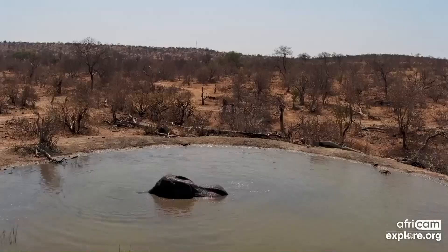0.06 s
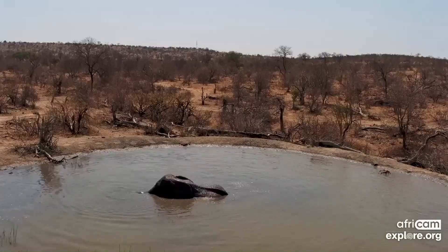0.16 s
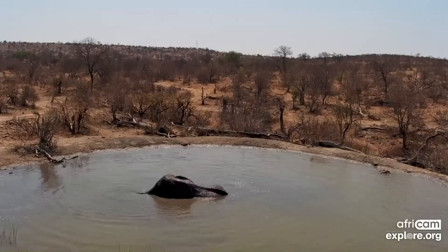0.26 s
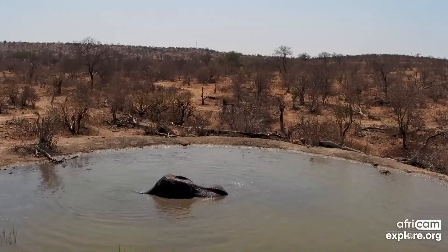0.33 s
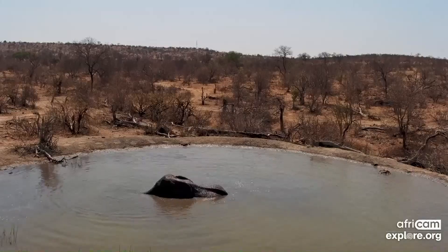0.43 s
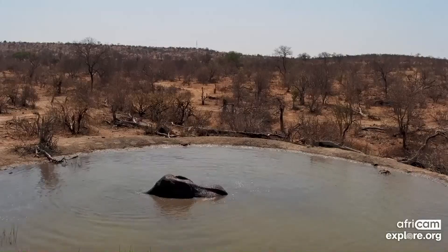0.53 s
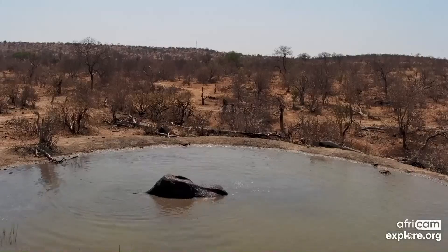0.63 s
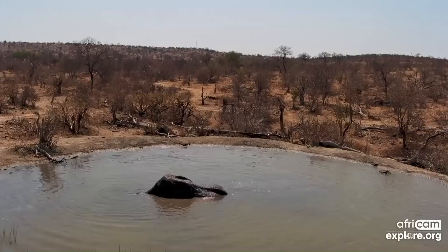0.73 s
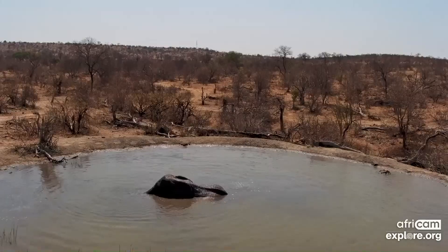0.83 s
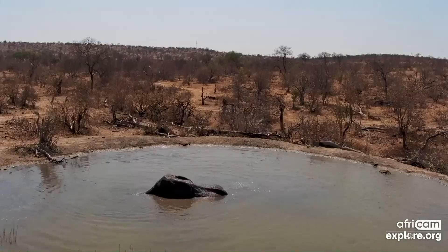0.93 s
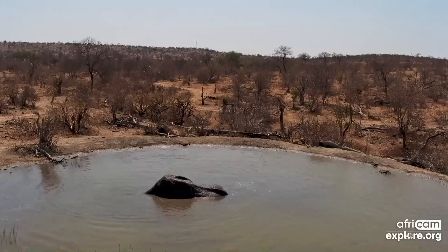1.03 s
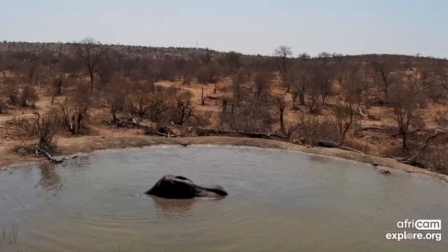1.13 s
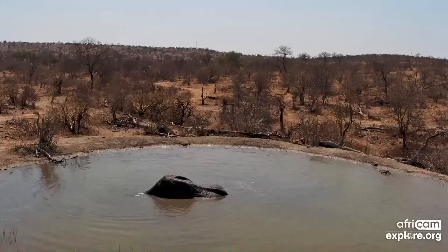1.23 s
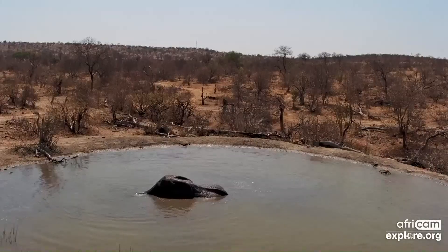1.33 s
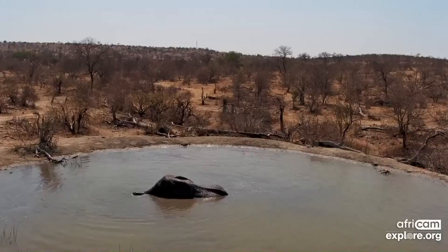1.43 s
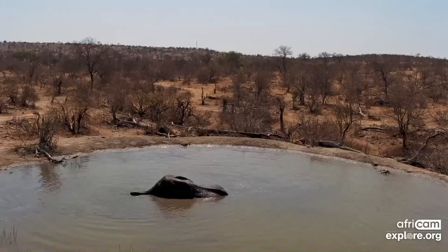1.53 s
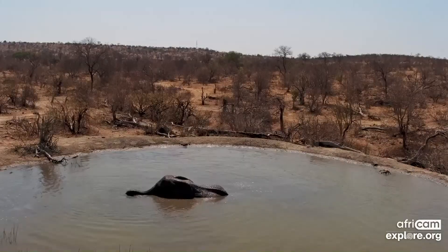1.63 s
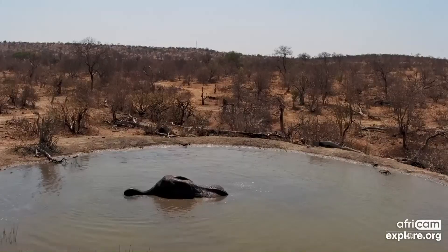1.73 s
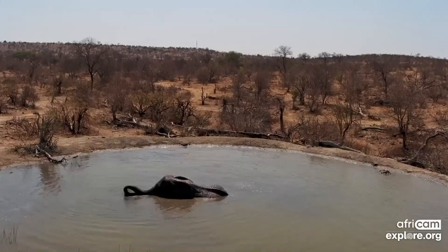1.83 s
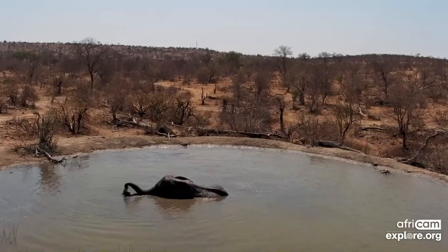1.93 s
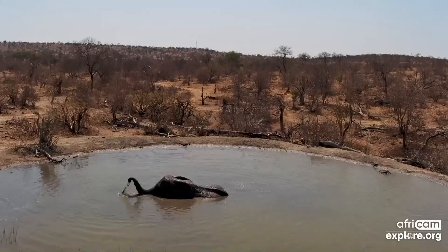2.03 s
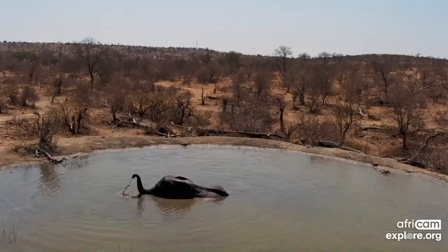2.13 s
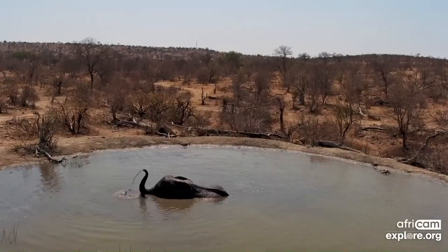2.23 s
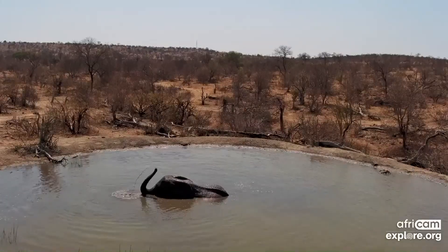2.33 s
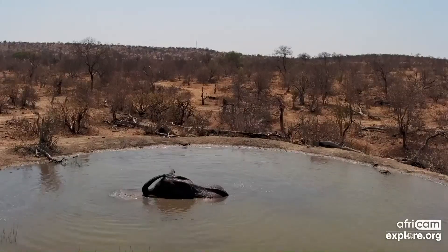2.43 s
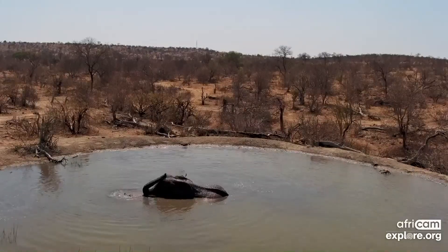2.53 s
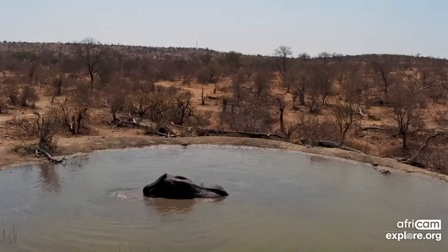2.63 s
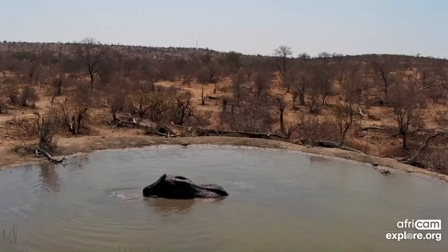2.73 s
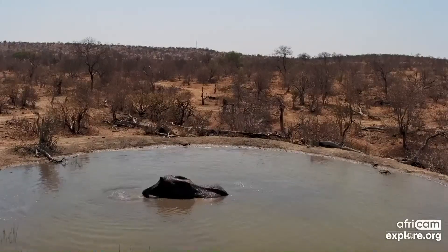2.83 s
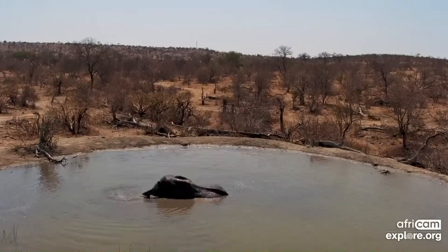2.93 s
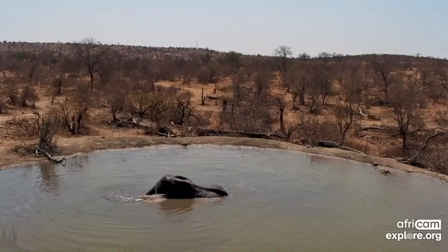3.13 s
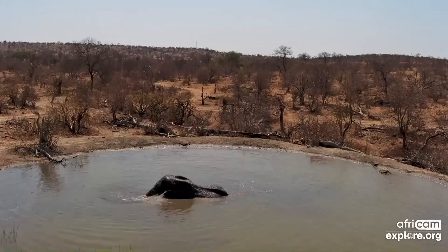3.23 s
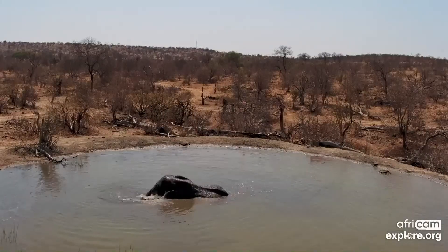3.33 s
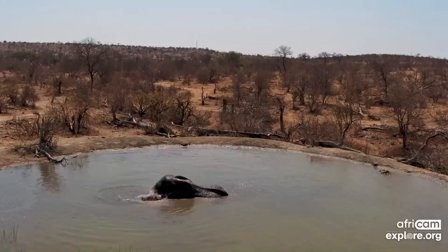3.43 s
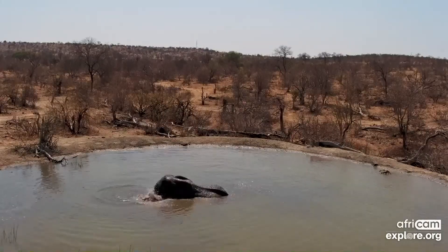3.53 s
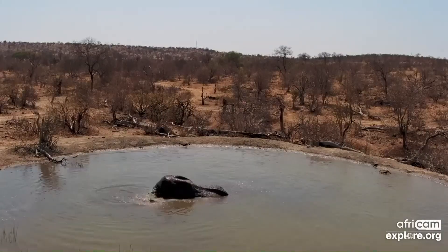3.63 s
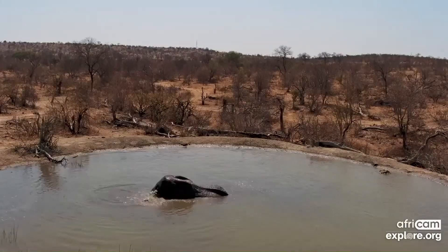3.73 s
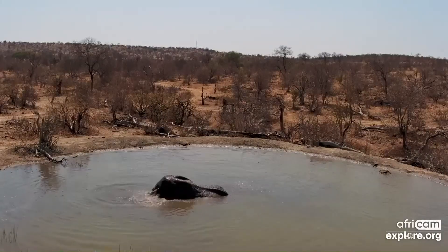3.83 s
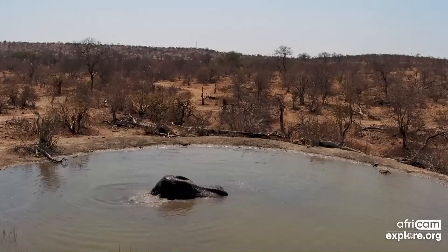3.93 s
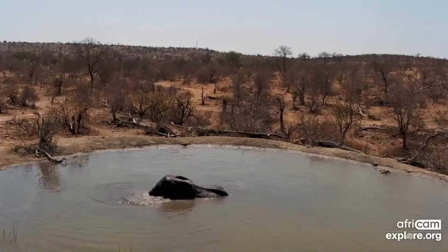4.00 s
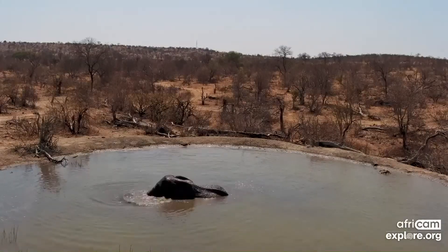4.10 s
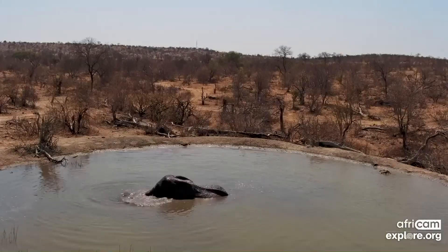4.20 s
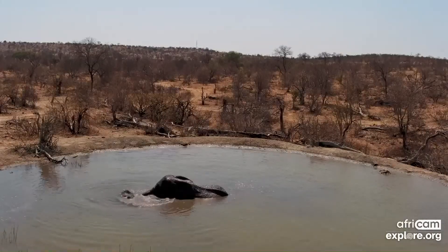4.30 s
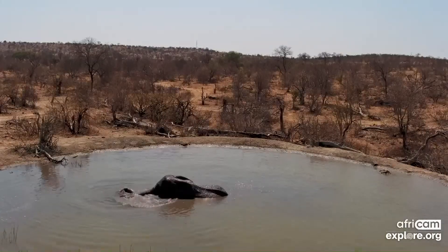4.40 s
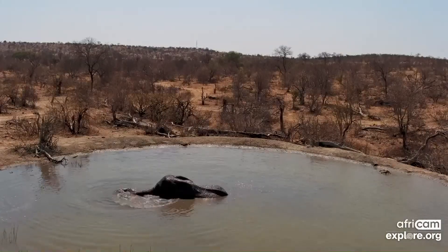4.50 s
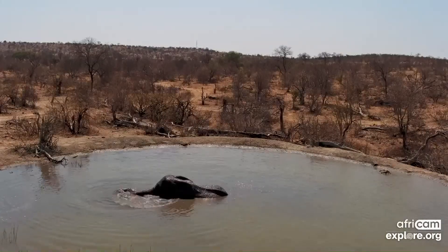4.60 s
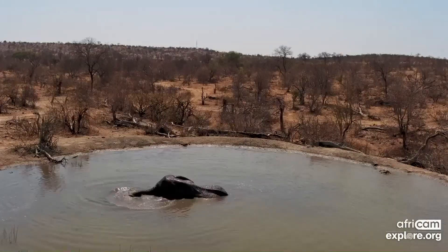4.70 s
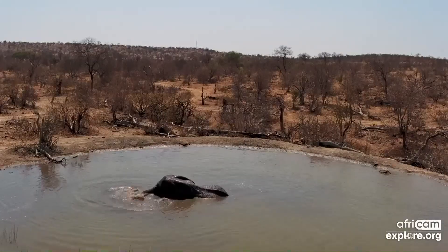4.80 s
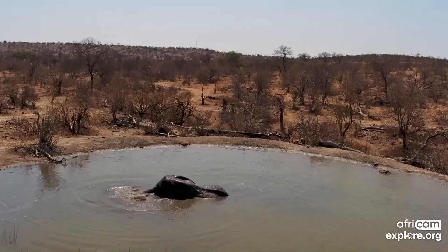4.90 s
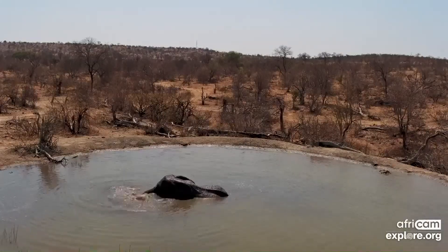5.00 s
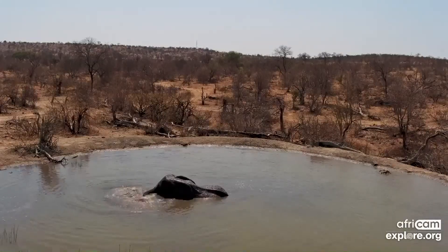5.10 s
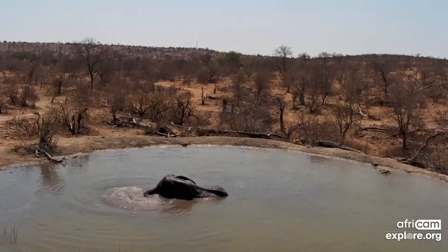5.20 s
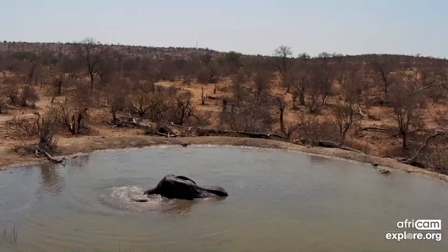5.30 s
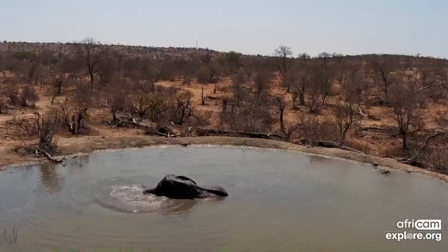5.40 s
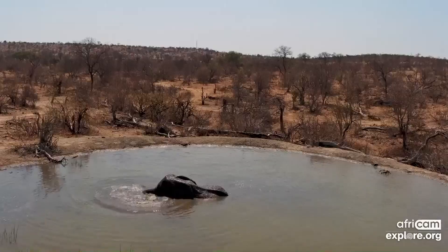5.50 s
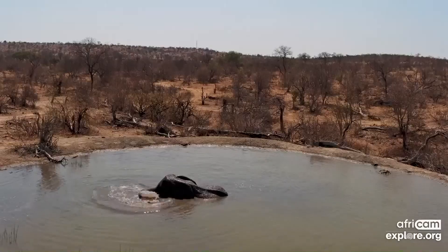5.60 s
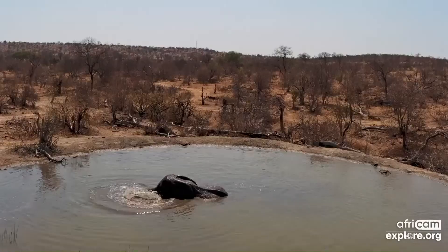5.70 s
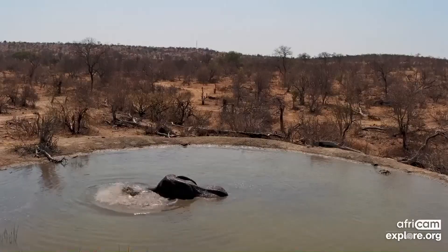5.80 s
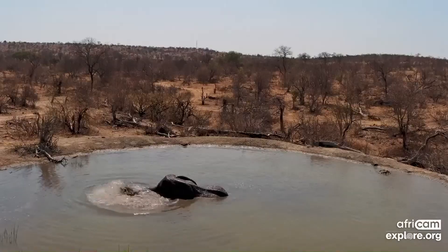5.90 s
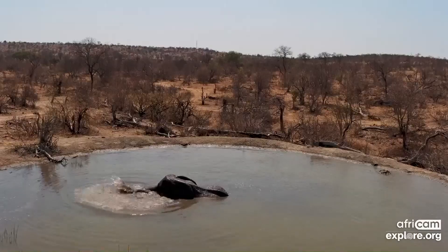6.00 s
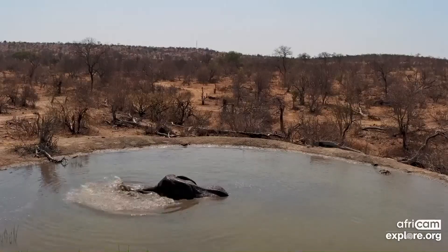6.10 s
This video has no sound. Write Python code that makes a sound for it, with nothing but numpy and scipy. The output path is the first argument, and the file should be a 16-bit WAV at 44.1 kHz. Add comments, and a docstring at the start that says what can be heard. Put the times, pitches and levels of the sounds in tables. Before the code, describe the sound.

After a quiet start with faint hiss, watery plops, dripping drops and churning splashes build outdoors as a large animal swishes its trunk through water.

```python
"""Elephant stirring a waterhole

An elephant lies in a waterhole, swings its trunk out and stirs it back in, some way from one microphone.
The churned water is a crowd of damped bubble tones over noise: big ones gulp, small ones splash and spray.
Listed plops, glugs, slaps, thuds and drips stand out; thrown drops patter back and thin trickles run.
The banks answer with a faint decaying tail; steady hiss and a thin mains buzz lie underneath."""
import sys
import numpy as np
from scipy import signal
from scipy.fft import rfft, irfft, next_fast_len
from scipy.io import wavfile
from scipy.ndimage import map_coordinates

SR = 44100
rng = np.random.default_rng(int(sys.argv[2]) if len(sys.argv) > 2 else 0)


def put_to_file(sound):
    """Save the sound as 16-bit audio at rate SR, in the file named by the first command-line argument."""
    columns = np.atleast_2d(sound).T  # one column per channel
    safe = np.clip(columns, -1, 1)
    whole_steps = np.round(safe * 32767)
    wavfile.write(sys.argv[1], SR, whole_steps.astype(np.int16))


N = 271215

# Strokes of the trunk; a deep one gulps, a shallow one sprays. Levels are before the trims below:
# start_s, length_s, settling_s, splash_db, gulp_db (re splash), spray_db (re splash)
STROKES = [(1.572, 0.036, 0.11, -59, 2.5, -6.5), (1.705, 0.15, .12, -52, -2.5, -7),
           (1.822, .065, 0.042, -48, -2.5, -14), (1.894, 0.15, 0.062, -48.5, -3.5, -7.5),
           (2.096, 0.089, 0.035, -51, -1, -3.5), (2.209, 0.05, 0.041, -50.5, -5, -1.5),
           (2.287, .18, 0.082, -51, -3.5, -3.5), (2.437, .15, 0.087, -59, 2.5, 3),
           (2.61, .035, .04, -52, -5, -1), (2.66, .035, 0.047, -49, -2.5, -5),
           (2.725, 0.083, 0.094, -48, -3, -4.5), (2.83, 0.16, 0.069, -44, -7, -8),
           (2.923, 0.072, 0.073, -45.5, -5.5, -7), (3.008, 0.18, 0.076, -49, 2, -3),
           (3.191, 0.057, 0.075, -41, -3, -7.5), (3.295, 0.25, .12, -51.5, 2, -6),
           (3.445, 0.11, 0.061, -49, -0.5, -7.5), (3.515, 0.08, 0.13, -44, -14, -10.5),
           (3.628, .19, 0.086, -48.5, -4, -6), (3.887, 0.059, 0.16, -52.5, -8.5, -6.5),
           (4.036, .49, .12, -56, -3.5, -10), (4.247, 0.044, 0.036, -47.5, -5, -17),
           (4.312, 0.15, 0.21, -43.5, -2, -10.5), (4.445, .16, 0.05, -47, -0.5, -15),
           (4.646, 0.064, 0.11, -44.5, 1, -10.5), (4.802, 0.1, 0.084, -46, 0.5, -8),
           (4.954, 0.19, 0.087, -45.5, -2.5, -7.5), (5.112, .11, 0.08, -43.5, -1, -15),
           (5.275, 0.15, 0.066, -48, 4, -11), (5.461, 0.056, 0.18, -47.5, 0, -4.5),
           (5.633, 0.044, 0.049, -45.5, -0.5, -6.5), (5.659, 0.071, 0.051, -44.5, -16, -3.5),
           (5.736, 0.2, 0.099, -43.5, -5.5, -2), (5.928, 0.23, .1, -42, -6, -2.5)]
ATTACK_S = 0.027  # water gathers speed
SURGE_DB, SURGE_RATE = 0.69, 16  # uneven flow within a stroke: depth, random knots a second

# Filter colours of the three sizes of bubble: frequency_hz, gain_db
GULP_COLOUR = [(70, -33), (150, -21), (260, -15), (330, -13), (420, -7), (540, -3.5), (640, 0), (760, -1.5),
               (850, -8), (950, -11), (1400, -40)]
SPLASH_COLOUR = [(550, -59), (830, -13), (930, -0.5), (1080, -0.5), (1300, -3), (1480, 0), (1670, -10),
                 (1880, -4), (2100, -1.5), (2370, -9.5), (2620, -3), (3050, -16.5), (3700, -6), (6000, -22)]
SPRAY_COLOUR = [(1800, 6), (2600, -7), (3200, -8), (3600, -6.5), (4250, -4.5), (4700, -8), (5200, -11),
                (5900, -38), (6800, -14), (7700, -12.5), (9500, -20), (12000, -23.5)]
GULP_TRIM_DB, SPLASH_TRIM_DB, SPRAY_TRIM_DB = -0.53, -0.5, 1
GURGLE_DB = -7.5  # sparse larger bubbles, re the untrimmed gulps
HEAVE_DB, HEAVE_HZ = -20.5, 228  # low slosh: level re the untrimmed gulps, centre

# Filter colour of bursting foam: frequency_hz, gain_db
FOAM_COLOUR = [(3500, 1), (5000, 4.5), (5600, -6.5), (6100, 2), (6900, -25), (7700, -14), (12000, -12)]
# foam level when the spray is at the knee; dB of foam per dB of spray
FOAM_DB, FOAM_KNEE_DB, FOAM_GROWS = -50, -45, 1.9

# Water and trunk slapping the surface; level is before the swell and the low cut:
# start_s, level_db, brightness_db_per_octave, t60_s
SLAPS = [(2.353, -32, -6, 0.0064), (2.4047, -33.5, -0.5, 0.063), (2.685, -41.5, 5, 0.059),
         (2.761, -27.5, 0.5, 0.013), (3.2369, -22.5, 0, 0.049), (3.255, -31, 1, 0.06),
         (3.437, -31, 1.5, 0.031), (3.553, -29, -3, 0.023), (4.286, -34, -3.5, 0.032),
         (4.685, -33, -2.5, 0.11), (5.418, -32.5, -2.5, 0.14), (5.694, -29, 1.5, 0.15),
         (6.071, -20, -2, 0.12), (6.119, -25.5, -0.5, 0.065)]

# Single air pockets closing; the high rows near 1.5-1.6 s are falling drops that ring the same way. # Level is
# before the trim and the swell: start_s, level_db, pitch_hz, t60_s, bend_octaves
PLOPS = [(.025, -52.5, 734, 0.15, 0.055), (0.182, -42, 1340, 0.03, -0.048), (.498, -48, 1010, 0.028, 0.052),
         (.598, -54.5, 1610, .2, 0), (1.412, -37, 795, 0.071, -0.41), (1.51, -51, 2620, 0.027, 0),
         (1.538, -46.5, 2530, 0.028, 0), (1.597, -42.5, 2460, 0.035, .3), (1.611, -36, 725, 0.078, -0.51),
         (1.623, -44, 2600, 0.032, 0), (1.646, -45, 1000, 0.043, 0.19), (1.684, -30, 684, 0.024, -.1),
         (1.73, -42, 646, .06, -0.099), (1.764, -27.5, 530, 0.021, 0), (1.786, -38.5, 938, 0.11, 0.051),
         (1.794, -36.5, 737, 0.19, -0.18), (1.826, -31, 566, 0.046, 0.33), (1.839, -29.5, 896, 0.029, 0.4),
         (1.856, -39, 1990, 0.077, .05), (1.88, -41, 610, .04, .3), (1.909, -34, 686, 0.043, 0.13),
         (1.983, -35, 784, 0.14, -0.17), (1.999, -31, 656, 0.056, 0.13), (2.131, -38, 667, 0.055, -0.13),
         (2.203, -38, 780, .04, -0.089), (2.311, -35.5, 930, 0.051, 0.21), (2.323, -30, 1370, 0.03, 0.056),
         (2.352, -25, 800, 0.019, 0.0055), (2.403, -30.5, 1300, 0.047, 0.52), (2.482, -39, 1230, 0.032, 0),
         (2.677, -36, 1400, .035, -0.062), (2.898, -30, 1380, .025, 0.22), (3.079, -24, 700, 0.043, -0.061),
         (3.182, -34, 790, .04, -0.41), (3.223, -27, 570, 0.021, -0.11), (3.238, -18, 1068, 0.022, -0.058),
         (3.2975, -18.5, 663, 0.031, -0.046), (3.333, -25.5, 710, 0.03, -0.057),
         (3.348, -21.5, 575, 0.032, -0.2), (3.388, -29, 634, .06, -0.15),
         (3.437, -33.5, 1440, 0.046, 0.058), (3.481, -24.5, 524, 0.03, 0.046),
         (3.907, -32.5, 1410, 0.037, 0.035), (3.948, -34.5, 740, 0.057, -0.014),
         (4.267, -25.5, 614, 0.038, 0.5), (4.285, -19, 770, 0.032, -0.45), (4.605, -33, 730, 0.09, -.2),
         (4.688, -22, 583, 0.042, -0.13), (4.988, -32, 720, .04, 0), (5.171, -37, 585, 0.026, 0.075),
         (5.341, -34, 580, 0.072, -0.17), (5.389, -36, 750, 0.022, -0.16), (5.406, -26, 696, 0.048, 0.24),
         (5.419, -30, 1000, 0.071, 0.12), (5.425, -30, 752, 0.049, -0.088),
         (5.484, -18.5, 620, 0.02, -0.25), (5.558, -29.5, 660, 0.045, 0.12),
         (6.073, -15.5, 673, 0.029, -0.036), (6.088, -26, 1070, 0.036, -0.076),
         (6.111, -17, 1070, 0.02, -0.094)]
PLOP_TRIM_DB, BEND_S = -3, 0.015  # trim; time constant in which the pitch settles

# Deep pockets collapsing with a dull thud; level is before the swell: start_s, level_db, pitch_hz
THUDS = [(3.233, -35, 265), (4.535, -41, 314), (4.687, -45, 222), (5.152, -43.5, 288), (5.385, -42.5, 300)]
THUD_T60_S = 0.048

# Runs of bubbles as a cavity opens or closes; level is typical of one bubble, before its swell:
# start_s, length_s, level_db, first_pitch_hz, last_pitch_hz
GLUGS = [(1.541, 0.014, -47, 1110, 900), (1.73, .04, -51, 970, 1190), (3.256, .025, -33, 950, 750),
         (3.389, 0.084, -38.5, 650, 440), (4.348, 0.081, -35.5, 1244, 930), (4.677, 0.048, -32.5, 525, 713),
         (4.821, 0.078, -38, 610, 810), (5.31, 0.066, -35, 810, 550), (5.814, 0.06, -34, 595, 688)]
GLUG_RATE, GLUG_T60_S = 100, 0.034  # bubbles a second; ring of each

# Sharp ticks of falling drops; level is before the trim: start_s, level_db, pitch_hz, scatter_t60_s
DRIPS = [(.046, -44, 3180, 0.11), (0.59, -35, 4100, 0.078), (1.691, -41.5, 2600, .03),
         (1.731, -36, 4300, 0.015), (1.753, -36, 2120, 0.033), (1.852, -34, 2040, .07),
         (1.887, -34, 2800, .025), (1.9453, -32, 1150, 0.02), (2.036, -34, 3860, .03),
         (2.079, -40, 3400, .015), (2.1544, -30.5, 4040, .012), (2.172, -32, 2680, .06),
         (2.258, -26, 2630, 0.044), (2.296, -27, 4040, 0.094), (2.3535, -25.5, 2790, 0.017),
         (2.3832, -24, 3820, 0.032), (2.529, -29, 2900, 0.044), (2.556, -31, 2880, 0.025),
         (2.573, -33, 3880, .02), (2.643, -30, 4340, 0.045), (2.6848, -29.5, 4200, 0.02),
         (2.685, -28, 2060, 0.028), (2.697, -31, 3960, 0.027), (2.761, -28, 2550, .015),
         (2.814, -28, 2320, 0.044), (2.8803, -29, 2500, .03), (3.0397, -26, 2140, 0.034),
         (3.5207, -25.5, 2700, 0.022), (3.553, -22, 1930, 0.029), (3.662, -33, 1320, .025),
         (3.7175, -24.5, 2190, 0.015), (3.761, -35, 1220, 0.052), (3.8127, -21.5, 2700, 0.029),
         (4.724, -28, 4140, 0.023), (5.129, -29, 3800, .02), (5.177, -28, 2200, 0.072)]
DRIP_TRIM_DB = -8.5

# Water running off the raised trunk in thin streams: start_s, length_s, level_db, pitch_hz
TRICKLES = [(1.496, 0.13, -70, 2540), (2.15, 0.042, -52, 2570), (2.349, 0.32, -54.5, 1357)]
TRICKLE_SPREAD = 0.09  # pitch range within a stream, as a share either way

# thrown spray comes down this much later, this much weaker; spray level at which drops merge
FALL_S, SHOWER_DB, SHOWER_TOP_DB = 0.06, -4, -46

# Filter colour of still air and microphone noise: frequency_hz, gain_db
HISS_COLOUR = [(12, -40), (20, -0.5), (97, -6.5), (127, -8.5), (228, -13.5), (261, -12.5), (458, -12.5),
               (510, -9.5), (632, -10), (1170, -13), (1270, -13.5), (1750, -13.5), (2540, -15),
               (3800, -16.5), (12000, -20.5), (15600, -77), (22000, -120)]
HISS_DB = -61
TOP_HZ = 12150  # band limit


def amp(db):
    """Turn decibels into a linear gain."""
    return 10 ** (np.asarray(db) / 20)


def unit(x):
    """Scale a sound to an rms of 1."""
    return x / np.sqrt(np.mean(x ** 2) + 1e-20)


def colour(points, hz):
    """Gain at hz, joining the (frequency_hz, gain_db) points along a log axis."""
    f, db = np.transpose(points)
    return amp(np.interp(np.log(hz + 1), np.log(f), db, left=-80, right=-80))


def filtered(x, response):
    """Shape the spectrum of x by a gain that is a function of frequency."""
    m = next_fast_len(len(x) + 8192)
    spectrum = rfft(x, m) * response(np.fft.rfftfreq(m, 1 / SR))
    return irfft(spectrum, m)[:len(x)]


def wobble(rate):
    """A smooth random curve with rate knots a second."""
    knots = rng.standard_normal(int(N * rate / SR) + 4)
    return map_coordinates(knots, [np.arange(N) * rate / SR])


def add(track, s, sound):
    """Lay a sound into the track at time s."""
    part = track[round(s * SR):][:len(sound)]
    part += sound[:len(part)]


def bubbles(rate, low_hz, high_hz, cycles, spread_db, size, rise=0.19):
    """A crowd of damped bubble tones of rms 1: rate a second, each falling 60 dB in about so many cycles."""
    when, pitch, life, strength, bend = rng.random((int(rate * N / SR), 5)).T[:, :, None]
    hz = low_hz + (high_hz - low_hz) * pitch
    t = np.arange(size) / SR
    age = t * hz / (cycles * (.5 + life))  # 1 when the ring is 60 dB down
    loud = amp(-spread_db * np.log(np.maximum(strength, .02))) * np.sqrt(hz)
    envelope = loud * amp(-60 * age) * (1 - np.exp(-2 * t * hz))
    glide = 1 + rise * (bend - .3) * np.minimum(age, 1)  # more of them climb than sag
    tones = envelope * np.sin(2 * np.pi * hz * t * glide)
    at = (when * N).astype(int) + np.arange(size)
    return unit(np.bincount(at.ravel(), tones.ravel(), N)[:N])


def churn(grains, spectrum, wash_db, clump_db):
    """Bubbles come in clumps, over a wash of ones too small to tell apart."""
    crowd = grains + amp(wash_db) * rng.standard_normal(N)
    clumped = crowd * amp(clump_db * wobble(80))
    return unit(filtered(clumped, lambda hz: colour(spectrum, hz)))


def strokes():
    """Strength of gulp, splash and spray: each stroke rises, holds and settles at its own pace."""
    t, power = np.arange(N) / SR, np.zeros((3, N))
    for s, length, settle, db, gulp_db, spray_db in STROKES:
        rising = np.clip((t - s) / ATTACK_S, 0, 1)
        settling = np.exp(-np.maximum(t - s - length, 0) / settle)
        levels = amp([[db + gulp_db], [db], [db + spray_db]])
        power += (levels * rising * settling) ** 2
    return np.sqrt(power) * amp(SURGE_DB * wobble(SURGE_RATE))


def stirred_water(gulping, splashing, spraying):
    """Large, small and tiny bubbles gulp, splash and spray as the strokes of the trunk drive them."""
    large = bubbles(850, 310, 1000, cycles=24, spread_db=1.1, size=2800, rise=.2)
    small = bubbles(1300, 800, 3200, cycles=36, spread_db=2.1, size=2000, rise=.13)
    tiny = bubbles(1800, 2400, 6000, cycles=26, spread_db=2.6, size=600)
    gulp = gulping * churn(large, GULP_COLOUR, wash_db=-1, clump_db=.6)
    splash = splashing * churn(small, SPLASH_COLOUR, wash_db=-3, clump_db=.7)
    spray = spraying * churn(tiny, SPRAY_COLOUR, wash_db=-2, clump_db=1.3)
    return amp(GULP_TRIM_DB) * gulp + amp(SPLASH_TRIM_DB) * splash + amp(SPRAY_TRIM_DB) * spray


def gurgle(gulping):
    """A few larger bubbles ring clear of the crowd."""
    notes = bubbles(70, 520, 1050, cycles=28, spread_db=1.5, size=3000)
    return amp(GURGLE_DB) * gulping * notes


def heave(gulping):
    """Deep strokes shove a mass of water aside with a low slosh."""
    noise = rng.standard_normal(N)
    low = filtered(noise, lambda hz: 1 / (1 + np.log2((hz + 1) / HEAVE_HZ) ** 2) ** 2)
    return amp(HEAVE_DB) * gulping * unit(low)


def foam(spraying):
    """The hardest strokes leave a sheet of bursting foam, which grows faster than the spray."""
    fine = bubbles(2100, 4300, 8000, cycles=14, spread_db=4, size=150)
    strength = amp(FOAM_DB) * (spraying / amp(FOAM_KNEE_DB)) ** FOAM_GROWS
    return strength * churn(fine, FOAM_COLOUR, wash_db=0, clump_db=1.5)


def slaps(attack_share=0.091):
    """A slap bursts bubbles of all sizes at once; a flatter hit is brighter, a shorter one sharper."""
    out, t = np.zeros(N), np.arange(SR // 5) / SR

    def water(hz):
        return colour(GULP_COLOUR, hz) + amp(-3.5) * colour(SPLASH_COLOUR, hz) + amp(-15.5) * colour(SPRAY_COLOUR, hz)

    for s, db, bright_db, t60 in SLAPS:
        noise = rng.standard_normal(len(t))
        # the tilt pivots at about 1 kHz
        burst = unit(filtered(noise, lambda hz: water(hz) * amp(bright_db * np.log2(hz / 1000 + 0.0062))))
        swell = 1 - np.exp(-t / (attack_share * t60))
        add(out, s, amp(db - 60 * t / t60) * swell * burst)
    return signal.sosfilt(signal.butter(2, 380, "high", fs=SR, output="sos"), out)


def plops(swell_cycles=1.3):
    """A bubble swells within a cycle or two and rings out, sagging if it sinks, climbing if it surfaces."""
    out, t = np.zeros(N), np.arange(SR // 5) / SR
    for s, db, hz, t60, bend in PLOPS:
        pitch = hz * 2 ** (bend * (1 - np.exp(-t / BEND_S)))
        phase = 2 * np.pi * np.cumsum(pitch) / SR
        swell = 1 - np.exp(-(t * hz / swell_cycles) ** 2)
        add(out, s, amp(db + PLOP_TRIM_DB - 60 * t / t60) * swell * np.sin(phase))
    return out


def thuds():
    """A very large bubble gives only a few soft, low swings."""
    out, t = np.zeros(N), np.arange(SR // 5) / SR
    for s, db, hz in THUDS:
        swell = 1 - np.exp(-t * hz)
        add(out, s, amp(db - 60 * t / THUD_T60_S) * swell * np.sin(2 * np.pi * hz * t))
    return out


def glugs(scatter=0.023, spread_db=2):
    """A cavity sheds a quick run of bubbles whose pitch slides as it changes size."""
    out, t = np.zeros(N), np.arange(SR // 10) / SR
    for s, length, db, first_hz, last_hz in GLUGS:
        count = int(length * GLUG_RATE) + 1
        for k, (late, size, loud) in enumerate(rng.standard_normal((count, 3))):
            age = max(k + late / 2, 0) / GLUG_RATE
            hz = np.interp(age, [0, length], [first_hz, last_hz]) * (1 + scatter * size)
            envelope = amp(db + spread_db * loud - 60 * t / GLUG_T60_S) * (1 - np.exp(-t * hz / 2))
            add(out, s + age, envelope * np.sin(2 * np.pi * hz * t))
    return out


def drips(t60=0.014, scatter_db=-8, width_share=0.4):
    """A drop ticks and throws a scatter of droplets, tight or sprawling; high ticks cover a wider band."""
    out, t = np.zeros(N), np.arange(SR // 10) / SR
    for s, db, hz, scatter_t60 in DRIPS:
        tick = amp(-60 * t / t60) * np.sin(2 * np.pi * hz * t)
        noise = rng.standard_normal(len(t))
        droplets = unit(filtered(noise, lambda f: 1 / (1 + ((f - hz) / (width_share * hz)) ** 6)))
        scatter = amp(scatter_db - 60 * t / scatter_t60) * droplets
        add(out, s, amp(db + DRIP_TRIM_DB) * (tick + scatter))
    return out


def trickles():
    """A thin stream keeps trapping bubbles of nearly one size."""
    out, t = np.zeros(N), np.arange(N) / SR
    for s, length, db, hz in TRICKLES:
        flow = np.clip(np.minimum(t - s, s + length - t) / 0.014, 0, 1)  # fades in and out over 14 ms
        low_hz, high_hz = hz * (1 - TRICKLE_SPREAD), hz * (1 + TRICKLE_SPREAD)
        stream = bubbles(60, low_hz, high_hz, cycles=160, spread_db=-0.5, size=2200, rise=.03)
        out += amp(db) * flow * stream
    return out


def shower(spraying):
    """Thrown drops fall back and tick, some trapping a clear little bubble; heavy spray adds no more."""
    ticks = bubbles(130, 1500, 5200, cycles=7, spread_db=2.6, size=200, rise=.2)
    pings = bubbles(150, 1000, 4700, cycles=30, spread_db=2.2, size=2000)
    t = np.arange(N) / SR
    falling = np.minimum(np.interp(t - FALL_S, t, spraying), amp(SHOWER_TOP_DB))
    return amp(SHOWER_DB) * falling * unit(ticks + .6 * pings)


def softened(x, edge_hz=5400):
    """Wet contacts have little above a few kilohertz."""
    return signal.sosfilt(signal.butter(3, edge_hz, fs=SR, output="sos"), x)


def banks(x, t60=0.11):
    """The banks and bush scatter a faint tail."""
    t = np.arange(SR // 2) / SR
    tail = rng.standard_normal(len(t)) * amp(-60 * t / t60)
    return signal.fftconvolve(x, tail / np.linalg.norm(tail))[:N]


def hiss():
    """Still air and the microphone's own noise."""
    noise = rng.standard_normal(N)
    return amp(HISS_DB) * unit(filtered(noise, lambda hz: colour(HISS_COLOUR, hz)))


def mains_buzz(first_s=0.013, db=-40, spread_db=2):
    """Once a mains cycle a thin electrical spike gets into the microphone line."""
    at = np.arange(round(first_s * SR), N, SR // 50)  # 50 Hz mains
    spikes = np.zeros(N)
    spikes[at] = -amp(db + spread_db * rng.standard_normal(len(at)))
    return signal.sosfilt(signal.butter(1, 2500, "high", fs=SR, output="sos"), spikes)


def scene():
    """The strokes drive all the churned water; one microphone feeds both channels."""
    gulping, splashing, spraying = strokes()
    churned = stirred_water(gulping, splashing, spraying) + gurgle(gulping) + heave(gulping) + foam(spraying)
    single_bubbles = plops() + thuds() + glugs()
    falling_water = drips() + trickles() + softened(shower(spraying))
    water = churned + slaps() + single_bubbles + falling_water
    echo = amp(-15) * banks(water)
    mono = water + echo + hiss() + mains_buzz()
    return np.array([mono, mono])


def record(dry):
    """A very steep low-pass keeps next to nothing above the band limit."""
    return np.array([filtered(x, lambda hz: 1 / (1 + (hz / TOP_HZ) ** 200)) for x in dry])


dry = scene()
out = record(dry)
put_to_file(out)
```